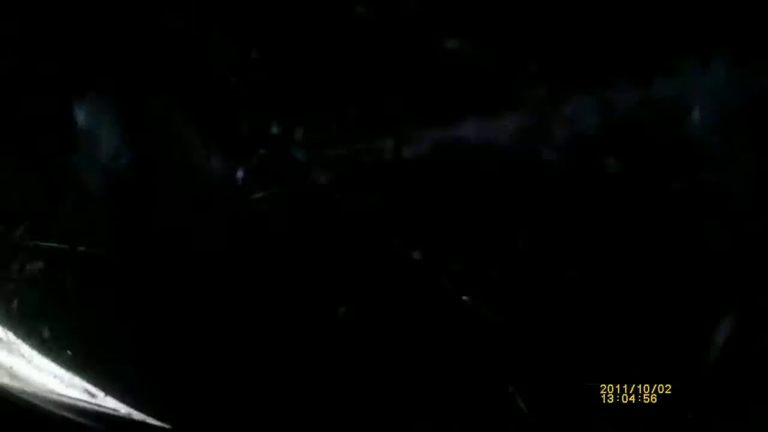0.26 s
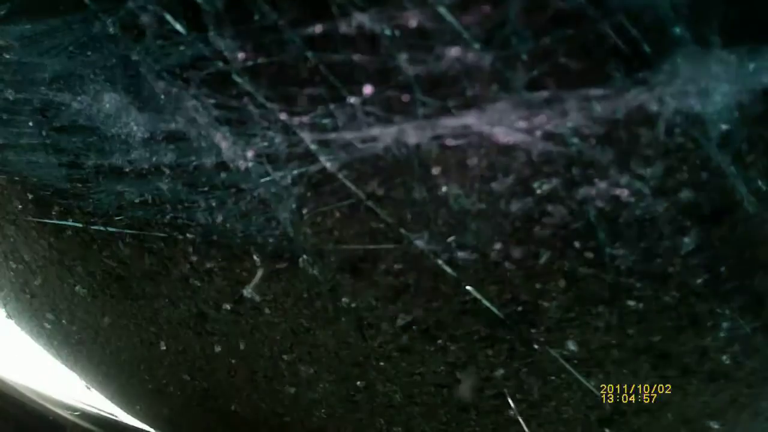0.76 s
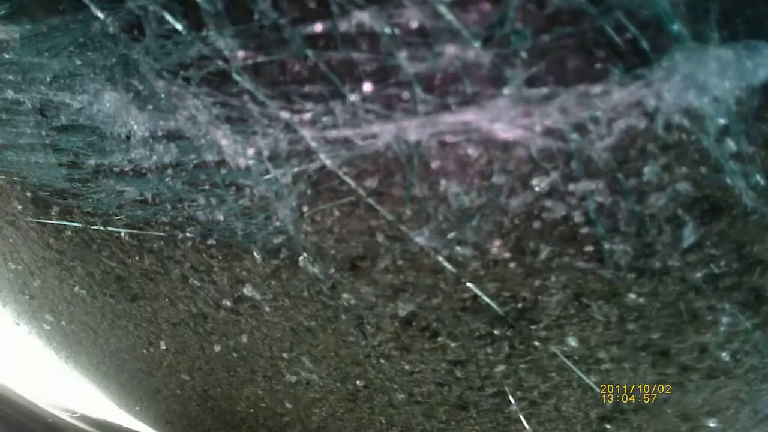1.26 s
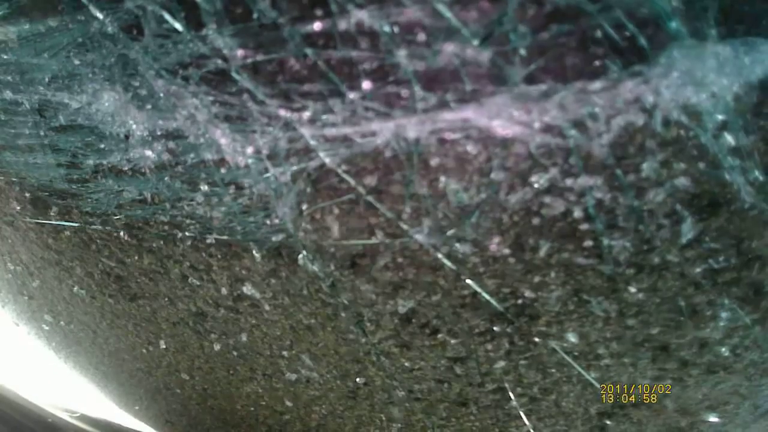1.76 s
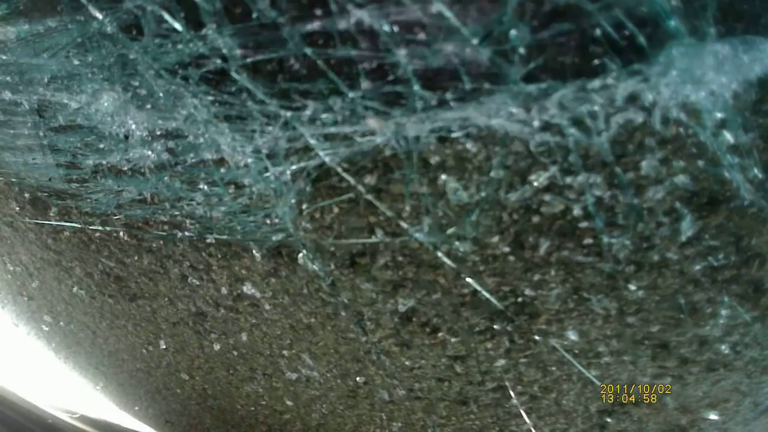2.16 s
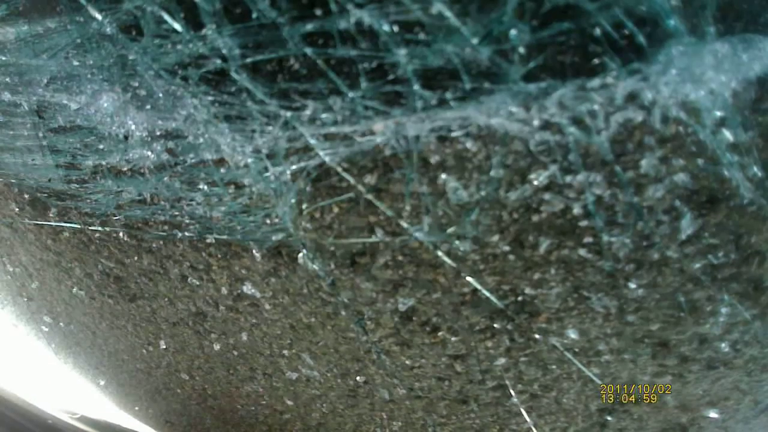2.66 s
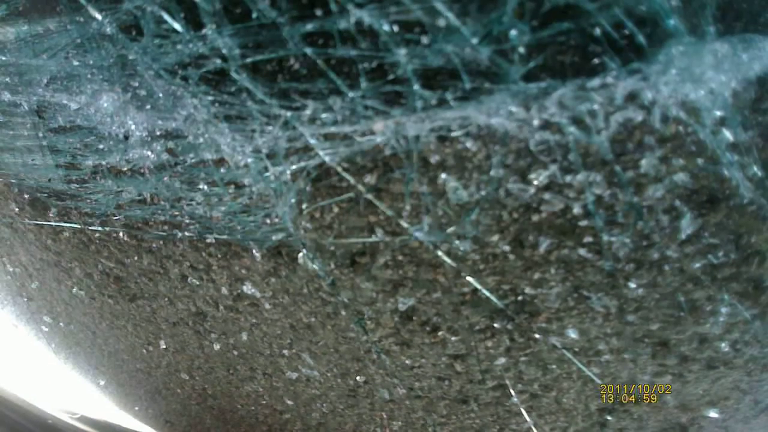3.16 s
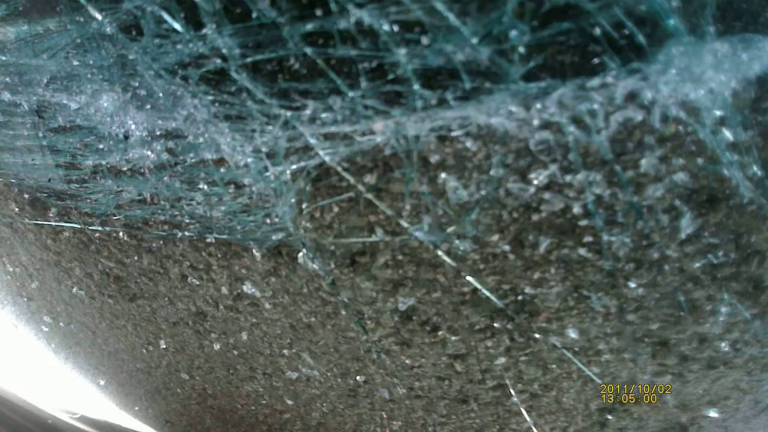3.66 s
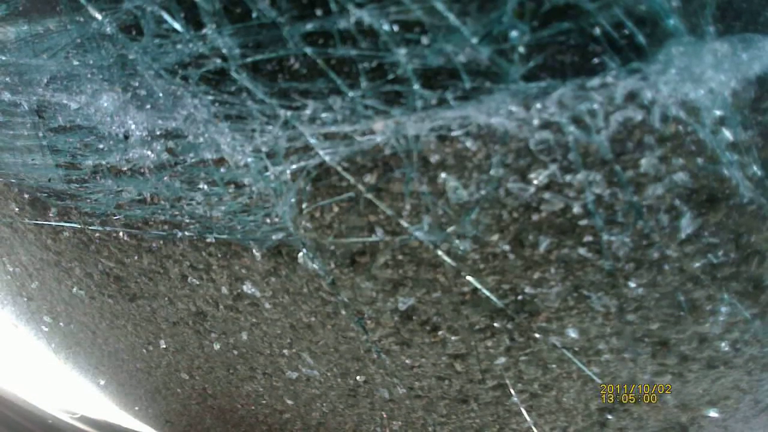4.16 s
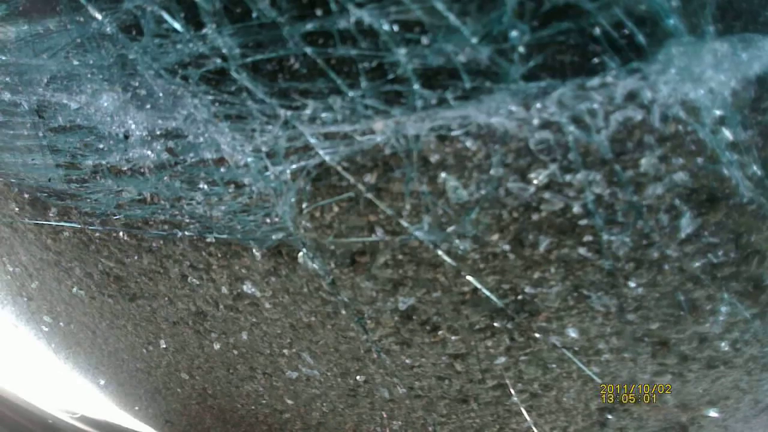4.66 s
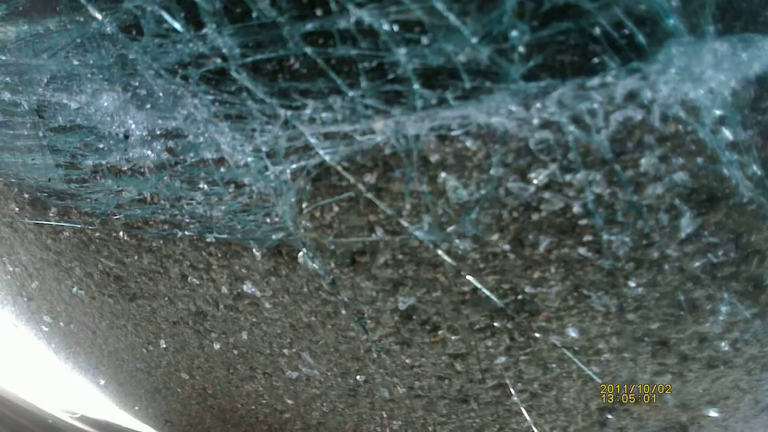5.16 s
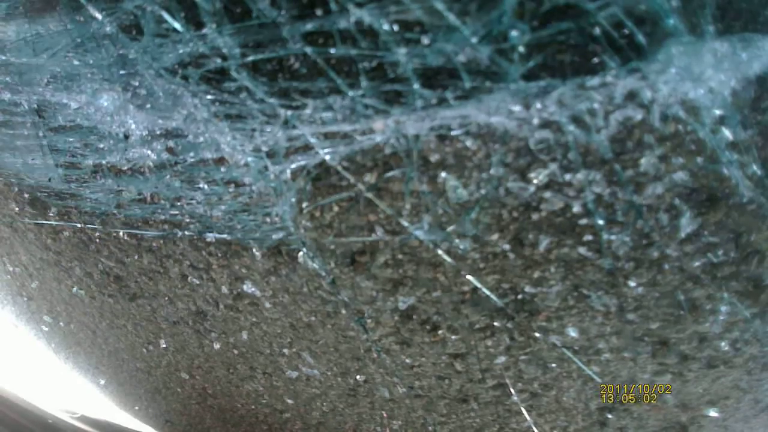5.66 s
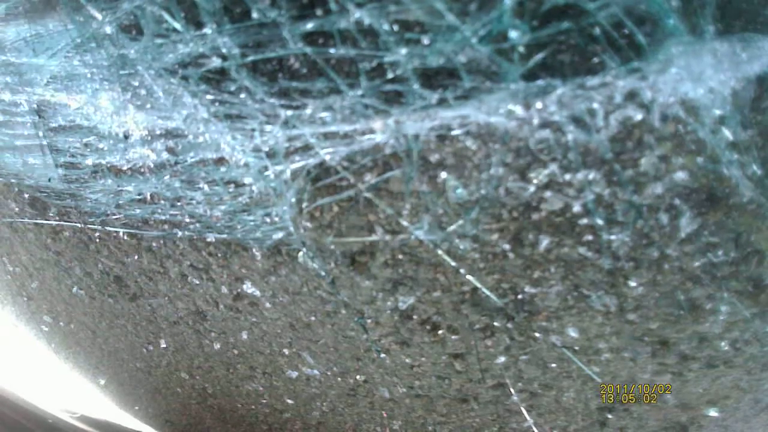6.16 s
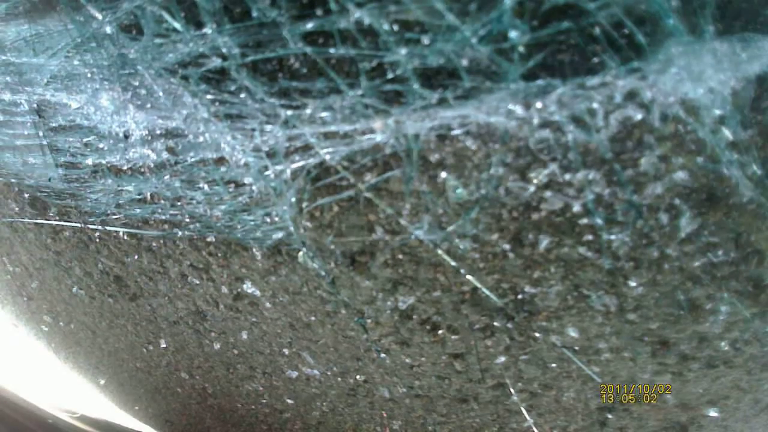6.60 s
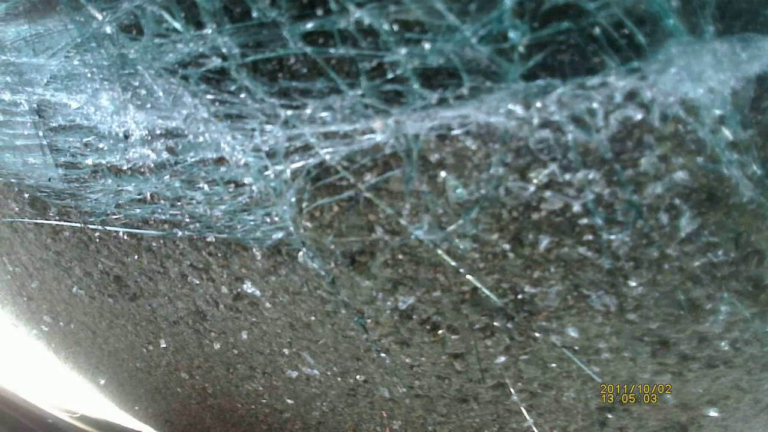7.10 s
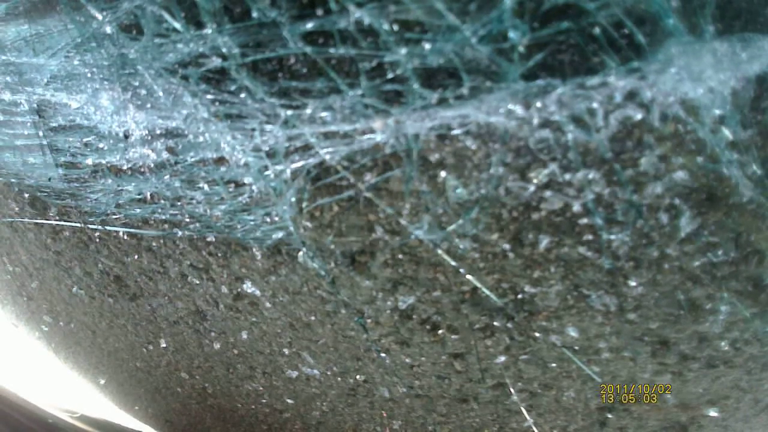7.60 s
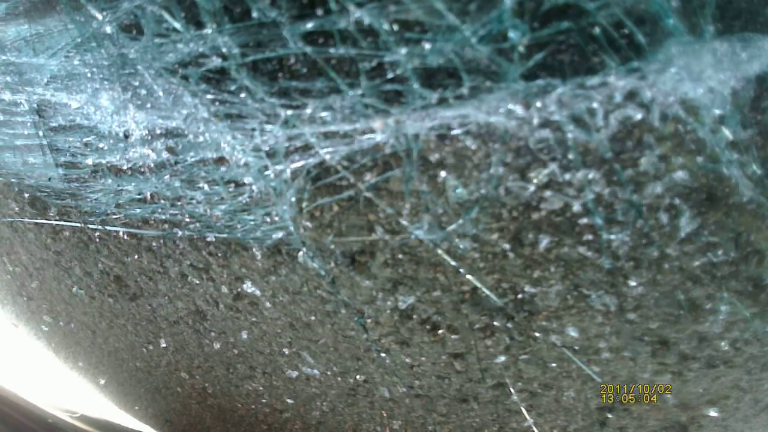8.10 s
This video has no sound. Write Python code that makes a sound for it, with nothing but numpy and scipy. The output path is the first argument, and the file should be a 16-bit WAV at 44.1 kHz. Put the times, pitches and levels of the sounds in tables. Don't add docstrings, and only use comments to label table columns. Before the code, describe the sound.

A squared-off, overloaded crash opens abruptly, with a short choked gap and another hit, then bodywork grinds to rest. Close, dry, dull-edged cabin sound: low hush and fine grit, scattered metallic knocks, shards clicking down. After a sparse lull, crunches return in two clusters separated by near quiet, with heavy buckling, short strained groans, pressure thumps and brittle glass cracks, continuing to the end.

```python
import sys
import numpy as np
from scipy import signal
from scipy.io import wavfile
from scipy.ndimage import uniform_filter1d

SR = 44100
rng = np.random.default_rng(int(sys.argv[2]) if len(sys.argv) > 2 else 0)


def unload_audio(sound):
    columns = np.transpose(np.atleast_2d(sound))
    steps = np.round(np.clip(columns, -1, 1) * 32767)
    wavfile.write(sys.argv[1], SR, steps.astype(np.int16))


def ratio(d):
    e = np.asarray(d, float) / 20
    return 10 ** e


N = 367794
T = np.arange(N) / SR

# start [s], grinding level [dB], slow push on the microphone [full scale], brightness [dB].
IMPACT = [
    (0, 16.5, 3.6, -13),
    (.03, 10, 3.3, -6.5),
    (.105, 9, 2.55, -7),
    (0.166, 6, 2.04, 6.5),
    (0.179, -16, 0.95, 11),
    (.3, -16, 0.99, 8),
    (0.31, -1.5, 2.05, 1),
    (0.359, 0, 1.66, 6),
    (.41, -6.5, 1.13, 14.5),
]
SLIDE = [(.448, 4, 1.44, 3.5), (.712, 0.5, 0.28, 7), (.86, -7, 0.1, 10), (1.04, -8.5, 0.02, 6),
         (1.2, -12, 0.01, 11), (1.3, -12.5, 0, 5), (1.47, -19.5, 0, 8), (2.06, -21.5, 0, 7),
         (2.69, -21.5, 0, -0.5), (3.4, -23.5, 0, 9), (4.45, -22.5, 0, -2.5), (4.95, -19.5, 0, 5.5),
         (5.5, -23, 0, 9.5), (5.89, -23.5, 0, 12), (6.5, -21, 0, 3.5), (7.25, -19, 0, 6.5),
         (7.6, -23, 0, 6), (8, -20, 0, -3), (8.34, -24, 0, -10)]
# frequency [Hz], density [dB per Hz].
GRIND = [(24, -43.5), (40, -15), (357, -6.5), (400, -1.5), (574, -6), (703, -1.5), (1100, 0), (1580, -3),
         (2540, -6.5), (4250, -16), (5550, -15), (7510, -18), (8800, -24.5), (11400, -71.5), (19400, -120)]
CABIN_DB = -23.5
RAIL = .707


def evened(x):
    return x / np.sqrt(np.mean(x ** 2) + 1e-20)


def colour(x, points):
    kept = [p for p in points if p[0] < 8300]
    hz, db = np.transpose(kept + [(8700, kept[-1][1]), (10000, -100)])
    log_hz = np.log(np.abs(np.fft.fftfreq(4096, 1 / SR)) + 1)
    log_gain = np.interp(log_hz, np.log(hz), db) * np.log(10) / 20
    response = np.exp(np.conj(signal.hilbert(np.maximum(log_gain, -11))))
    taps = np.fft.ifft(response).real
    return signal.oaconvolve(x, taps[:2048])[:len(x)]


def resonate(x, hz, width_hz):
    turn = np.exp(2j * np.pi * np.cumsum(hz * np.ones(len(x))) / SR)
    r = np.exp(-np.pi * width_hz / SR)
    smooth = signal.lfilter([1 - r], [1, -r], x / turn + 1e-18)
    return 2 * (turn * smooth).real


def split(x, hz):
    low = signal.lfilter(*signal.butter(1, hz, fs=SR), x)
    return low, x - low


def drift(hz):
    lowpass = signal.butter(2, hz, fs=SR, output="sos")
    return evened(signal.sosfilt(lowpass, rng.standard_normal(N)))


def snaps(per_s, spread_db):
    size = ratio(spread_db * np.minimum(rng.exponential(1, N), 4))
    return evened(size * rng.standard_normal(N) * (rng.random(N) < per_s / SR))


def patchy(x, patch_db):
    z = signal.stft(x, nperseg=512, noverlap=384)[2]
    field = rng.standard_normal(z.shape[::-1]).T
    field = uniform_filter1d(uniform_filter1d(field, size=6, axis=0), size=7, axis=1)
    return evened(signal.istft(z * ratio(patch_db * evened(field)), nperseg=512, noverlap=384)[1][:N])


def add(mix, at, sound):
    part = mix[at:][:len(sound)]
    part += sound[:len(part)]


def panels(shaking, ring_db):
    # frequency [Hz], width [Hz], level [dB].
    modes = [
        (334, 25, -3),
        (543, 30, -2),
        (700, 50, -3),
        (893, 45, 0),
        (1190, 150, -6),
        (2680, 400, -6),
        (5520, 350, 4),
    ]
    ring = sum(ratio(db) * resonate(shaking, hz, width_hz) for hz, width_hz, db in modes)
    return shaking + ratio(ring_db) * ring


def control(column):
    # bite [s], swell [s], hold [s], top level [dB], brightness
    # [dB].
    crunches = [(1.323, .003, 0.041, -14, 10.5), (1.589, 0.004, .012, -9, 8),
                (2.082, 0.018, 0.021, -14.5, -12), (2.891, 0.017, .005, -10, -11),
                (6.758, .002, .004, -3.5, 1), (4.551, 0.079, 0.021, 0.5, -0.5),
                (4.555, .004, .03, -8.5, -13), (4.514, .005, .04, -16.5, -3),
                (4.642, 0.0023, 0.008, -4, -6), (4.752, 0.002, 0.021, -10.5, 3),
                (4.829, 0.042, 0.049, -15, -1), (5.016, 0.074, .004, 1.5, 4), (5.119, 0.06, 0.065, -5, 8),
                (5.26, .003, 0.12, -12, 7.5), (5.345, 0.0034, 0.023, -0.5, 0),
                (5.938, 0.034, 0.13, -19, -0.5), (6.069, 0.095, 0.049, 4.5, -6),
                (6.263, 0.022, 0.046, -8, -2), (6.318, 0.004, 0.018, -1.5, 7.5),
                (6.795, .003, 0.055, 0.5, -11), (6.867, 0.034, 0.072, 0.5, -18),
                (7.049, 0.0023, 0.02, 2.5, -26), (7.105, .003, 0.032, -12.5, 1),
                (7.159, 0.0065, 0.016, -13, 6), (7.295, 0.0028, 0.06, -4.5, -16),
                (7.381, 0.054, 0.09, -10, -28), (7.724, .003, 0.054, -13.5, -21),
                (7.89, 0.0033, .002, -7, -9), (7.936, .002, 0.019, -12, -14)]
    swell_db_per_s, fall_db_per_s, bite_s = 168, 349, 0.0042
    push_at_0_db, push_law, tail_bright = 0.2, 1.3, -.12
    rows = np.array([*IMPACT, *SLIDE])
    out, level_db = (np.interp(T, rows[:, 0], rows[:, k]) for k in (column, 1))
    for s, swell_s, hold_s, top_db, bright_db in crunches:
        near = slice(round(s * SR), round((s + swell_s + hold_s) * SR) + SR // 4)
        t = T[near] - s
        rise_db = swell_db_per_s * np.maximum(swell_s - t, 0)
        fall_db = fall_db_per_s * np.maximum(t - swell_s - hold_s, 0)
        db = top_db - rise_db - fall_db - 20 * np.maximum(1 - t / bite_s, 0)
        value = (db, push_at_0_db * ratio(push_law * db), bright_db + tail_bright * fall_db)[column - 1]
        out[near] = np.where(db > level_db[near], value, out[near])
        level_db[near] = np.maximum(db, level_db[near])
    return uniform_filter1d(out, size=90)


def grinding():
    clumps = ratio(1.5 * np.tanh(drift(hz=80)))
    decay = ratio(-120 * np.arange(300) / SR / 0.016)
    slip_power = signal.oaconvolve(snaps(per_s=1300, spread_db=2.0) ** 2, decay)[:N]
    slips = np.sqrt(np.abs(slip_power))
    shaking = clumps * np.hypot(evened(slips), 0.8) * rng.standard_normal(N)
    body = patchy(colour(panels(shaking, ring_db=-2.0), GRIND), patch_db=1.5)
    low, high = split(body, hz=2310)
    above_hush = np.sqrt(np.maximum(ratio(control(column=1)) ** 2 - ratio(CABIN_DB) ** 2, 1e-7))
    return above_hush * (low + ratio(control(column=3) - 2.5) * high)


def push(jolts):
    # start [s], length [s].
    pinned_spans = [(0, .0073), (.0117, .003), (.037, .007), (.0969, .0065), (.1727, .1371), (.3293, .007),
                    (.3596, .003), (.434, .003), (.4925, .003), (6.224, .004), (6.31, .006), (7.0566, .004)]
    # time [s], depth [full scale].
    rail_slips = [
        (.0155, 5),
        (.1045, 2),
        (.1075, 4),
        (.111, 4),
        (.3645, 2),
        (.3665, 2.5),
    ]
    slip_s = .0005
    shove, level_db = np.maximum(control(column=2), 0), control(column=1)
    pinned = sum(((T > s) & (T < s + length_s)) * 1. for s, length_s in pinned_spans)
    slips = sum(depth * np.exp(-((T - s) / slip_s) ** 2) for s, depth in rail_slips)
    rumble = ratio(3.5 * np.minimum(level_db, 3) - 29.5) * drift(hz=70)
    rumble *= .5 + .5 * (T > SLIDE[1][0])
    kick = 0.33 * uniform_filter1d(np.maximum(np.abs(jolts) - .25, 0), size=260)
    sway = 1 + 0.08 * np.minimum(ratio(level_db), 1) * drift(hz=60)
    shove *= np.maximum(np.clip((level_db + 15) / 6, 0, 1), T < SLIDE[0][0])
    return shove * sway + rumble + kick - slips + 9 * uniform_filter1d(pinned, size=9)


def burst(shake, snap, s, db, hz, width_hz, t60_s, treble_db):
    snap_db = -3.5
    at = round(s * SR)
    t = np.arange(4400) / SR
    decay = ratio(-60 * t / t60_s) + ratio(-8.0 - 60 * t / 0.0055) + ratio(-16.0 - 60 * t / (5.5 * t60_s))
    low, high = shake[:, at:at + len(t)] * decay * np.minimum(t / 0.00014, 1)
    ring = resonate((low + high) * ratio(-60 * t / 0.18), hz, width_hz)
    sound = evened(low) + 1.02 * evened(ring) + ratio(treble_db) * evened(high)
    sound = sound / np.abs(sound).max() + ratio(snap_db) * np.sign(low[9]) * snap
    return at, ratio(db) * sound / np.abs(sound).max()


def cracks():
    # time [s], peak [dB], ring [Hz]. Panel knocks while the wreck settles.
    settling = [(1.32, 4.5, 1820), (1.398, -4, 1230), (1.492, -2, 810), (1.5365, -7, 1140), (1.589, 2, 900),
                (1.674, 3.5, 1250), (1.736, -3, 910), (1.775, -1, 960), (1.812, -11, 1030),
                (1.911, 0.5, 1100), (1.996, -2.5, 960), (2.036, -0.5, 870), (2.088, -4.5, 1220),
                (2.141, -1.5, 1040), (2.24, -9, 990), (2.266, -11, 1010), (2.43, -11, 1000),
                (2.513, -7, 1130), (2.709, -6.5, 730), (2.716, -6, 900), (2.839, -2, 1160), (2.9, -6, 514),
                (2.966, -0.5, 1190), (3.127, -3, 835), (3.173, 6.5, 855), (3.264, -5.5, 890),
                (3.319, -5, 1110), (3.592, -6.5, 861), (3.6545, -3, 890), (3.697, -13, 900),
                (3.738, -14, 1220), (3.918, -6.5, 885), (4.165, -6, 910), (4.29, -6, 900)]
    buckling = [(4.508, -4, 1050), (4.538, -4, 1130), (4.555, -6, 1050), (4.752, 3, 2250),
                (4.865, -16, 1110), (4.905, -11, 1200), (4.962, -7, 1129), (5.021, 13, 657),
                (5.61, -7, 1140), (6.021, -14, 1080), (6.069, 11, 1086), (6.323, 1, 1300),
                (6.386, 11.5, 1290), (6.466, -4.5, 1070), (6.547, -9.5, 1170), (6.657, -1.5, 1220),
                (6.678, -4, 900), (6.764, 9, 1000), (7.05, 7.5, 980), (7.069, -4.5, 840), (7.295, 4, 910),
                (7.404, -1, 880), (7.449, 5.5, 686), (7.018, -5, 1000), (7.607, -11, 885), (7.739, -9, 900),
                (7.7215, -1, 860), (7.785, -1.5, 1270), (7.7945, 5, 1260), (7.887, 12.5, 1254),
                (7.943, 5.5, 864), (8.141, 2.5, 1100), (8.202, -2, 920), (8.256, 1.5, 1370)]
    glass_ticks = [(1.157, -7, 5530), (1.216, 11, 3600), (1.244, 9.5, 5500), (1.34, -5, 5750), (1.3975, 1, 4860),
                   (1.455, -2.5, 5790), (1.492, 5, 3080), (1.5362, 5.5, 3300), (1.598, 10, 3130),
                   (1.6778, 2, 5700), (1.9027, -6.5, 3020), (2.052, -1, 3260), (2.155, -2, 3220),
                   (2.142, -13, 3000), (3.718, -18, 5600), (3.879, -13.5, 5600), (2.802, -12, 1700),
                   (3.2705, -5, 5500), (1.633, -1, 2520), (1.737, -12, 6500), (1.813, -7, 5530),
                   (2.035, -2, 5500), (2.093, -6, 6000), (2.24, -14.5, 2800), (2.265, -20.5, 5500),
                   (2.378, -4.5, 6280), (2.43, -13, 5500), (2.481, -9.5, 5660), (2.685, -5, 2600),
                   (2.712, -2.5, 5600), (2.802, -8, 2430), (2.86, -9, 6000), (3.112, -10, 2660),
                   (3.175, -4, 2610), (3.32, -6, 5500), (3.418, -13.5, 5500), (3.461, -15, 5750),
                   (3.592, -13, 5000), (3.696, -22, 5500), (3.898, -15, 5560), (3.988, -13.5, 5300),
                   (4.06, -18.5, 5600), (4.12, -11, 5460), (2.5905, -6, 5570), (2.759, -11, 5440),
                   (2.84, -2, 2390), (2.897, -6, 3000), (2.911, 3, 5530), (2.9667, 0, 5440), (3.236, -7, 5800),
                   (3.262, -7, 3200), (3.508, -8, 2500), (3.6537, 0, 3680), (3.738, -4, 3460),
                   (3.9148, -9.5, 3180), (4.077, -10, 5600), (4.108, -6, 5500), (4.1654, -3.5, 3480),
                   (4.3592, -7, 5650),
                   (4.5793, 2.5, 3130), (4.602, 11, 6100), (5.0211, 8, 4660), (5.1475, 3.5, 5400),
              (5.2794, -1, 3220), (5.349, 7.5, 5400), (4.905, -3, 2580), (5.466, -10.5, 6000),
              (5.5258, -5, 3500), (5.598, -22, 5500), (5.684, -18, 3560), (5.78, -13, 5530),
              (5.89, -15, 5440), (5.951, -9.5, 3200), (6.045, -14, 6500), (7.407, 0, 2470),
              (7.435, -6, 3600), (7.362, -3, 4500), (7.378, -11, 5000), (7.667, -9, 5500),
              (7.685, -13, 5500), (7.772, -14, 6000), (8.09, -15, 5500), (6.079, 0, 3070),
              (6.316, 15, 6350), (6.6575, -4, 4960), (6.6764, 3, 5370), (6.771, 6, 5700), (6.7976, 0, 3890),
              (6.901, 16, 4500), (7.018, -5, 5000), (7.17, -9, 5500), (7.265, -5, 5260), (7.297, 4, 3000),
              (7.503, -1, 2700), (7.7936, 0, 3320), (7.8867, -7, 3130), (7.941, -12, 3300),
              (7.958, -9, 2000), (7.9, -7, 3400), (8.2544, 9.5, 5770)]
    out, ticks = np.zeros((2, N))
    panel, glass = (np.array(split(colour(rng.standard_normal(N + SR), GRIND), hz=3200)) for _ in "ab")
    snap = split(colour(signal.unit_impulse(4400, 9), GRIND), hz=900)[1]
    snap = snap / np.abs(snap).max()
    for knocks, treble_db, t60_s in ((settling, -1.1, 0.048), (buckling, -10, 0.047)):
        for s, db, hz in knocks:
            add(out, *burst(panel, snap, s, db - 3.0, hz, 85, t60_s * ratio(0.067 * db), treble_db))
    for s, db, hz in glass_ticks:
        add(ticks, *burst(glass, snap, s, db - 1.0, hz, width_hz=470, t60_s=.032, treble_db=1.7))
    thin_ticks = split(split(ticks, hz=1500)[1], hz=1500)[1]
    return out + thin_ticks


def groans():
    # start [s], length [s], level [dB], start pitch [Hz], end pitch [Hz]. Strained panels sing during
    strained_panels = [(1.076, 0.062, -12, 2310, 2030), (1.171, 0.033, -13, 900, 900),
                       (1.242, 0.027, -14.5, 246, 214), (2.087, 0.016, -11.5, 1250, 1160),
                       (2.895, 0.039, -14.5, 497, 390), (2.898, 0.02, -14.5, 2000, 1910),
                       (4.599, 0.022, -3, 426, 362), (4.609, 0.08, -8.5, 665, 667),
                       (4.746, 0.038, -14, 2370, 2230), (5.028, 0.027, -10, 680, 670),
                       (5.205, 0.072, -2.5, 830, 665), (5.242, 0.052, -11, 2100, 2120),
                       (6.079, 0.035, -6.5, 1140, 1080), (6.097, 0.041, -5.5, 553, 476),
                       (6.14, 0.051, -8, 1370, 1210), (6.234, 0.065, 1, 1310, 970),
                       (6.796, 0.081, -2.5, 898, 899), (6.784, 0.18, -11.5, 2480, 2660),
                       (6.912, 0.056, -11, 388, 320), (6.955, 0.052, -20, 1180, 1170),
                       (7.08, 0.062, -1, 710, 330), (7.309, 0.051, -10, 940, 930),
                       (7.296, 0.092, -15.5, 2580, 2360), (7.939, 0.03, -8.5, 1050, 1160),
                       (4.553, 0.079, -10.5, 1046, 1160), (4.86, 0.068, -35, 1120, 1090),
                       (5.062, 0.07, -13, 1090, 1060), (5.35, 0.04, -13, 1500, 1370),
                       (6.671, 0.027, -21, 800, 767), (7.316, 0.068, -30, 2900, 2840),
                       (7.497, 0.025, -13.5, 2700, 2880), (7.728, 0.052, -16.5, 920, 855),
                       (5.527, 0.018, -30, 3600, 3540), (5.68, 0.02, -30, 3560, 3570),
                       (0.454, 0.047, -0.5, 1060, 1170), (.53, 0.076, -10, 1156, 1134),
                    (0.65, .07, -14, 2800, 2600), (.8, 0.046, -17, 1170, 1250),
                    (0.939, .06, -12.5, 1240, 1150), (6.69, 0.057, -33, 800, 860),
                    (6.969, 0.022, -9, 2740, 2730), (5.215, .05, -9, 1150, 1100),
                    (5.25, .03, -14, 2650, 2600), (7.5, 0.038, -20, 930, 1000),
                    (6.32, 0.043, -9, 1150, 1080), (7.52, 0.029, -22, 3300, 3200),
                    (4.58, .04, -15, 1400, 1300), (6.135, .06, -9, 2200, 2100),
                    (6.108, 0.024, -16, 5550, 5500), (4.66, 0.043, -18, 1140, 1170),
                    (5.09, .06, -14.5, 1150, 1100), (6.96, 0.0452, -14, 1200, 1180),
                    (.86, 0.058, -15, 3160, 2840), (1.0, .05, -19, 2600, 2940),
                    (5.36, .035, -13, 1640, 1460), (4.752, 0.014, -14, 1500, 1470),
                    (7.44, 0.036, -22, 2430, 2500)]
    out = np.zeros(N)
    for s, length_s, db, start_hz, end_hz in strained_panels:
        count = round(length_s * SR)
        width_hz = 0.014 * start_hz + 0.83 * abs(end_hz - start_hz)
        hz = np.geomspace(start_hz, end_hz, count)
        rub = rng.standard_normal(SR // 2)[:count]
        sung = resonate(resonate(rub, hz, width_hz), hz, 8.4 * width_hz)
        add(out, round(s * SR), ratio(db) * evened(sung) * signal.windows.tukey(count, .5))
    return out


def thuds():
    # centre [s], level [dB], length [s].
    lurches = [(.534, -14, .012), (.597, -12, .014), (0.672, -5, 0.011), (.69, -14, .01),
               (0.752, -12, .014), (.818, -6, .014), (0.852, -17, .014), (0.9, -21, .014),
               (0.978, -14, .018), (1.068, -22, .014), (1.22, -16, .014), (1.247, -13, 0.013),
               (4.563, -14, .012), (4.583, -15, 0.012), (4.604, -17, 0.011), (5.088, -7, .018),
               (5.157, -12, 0.012), (5.213, -7, .018), (5.258, -16, .02), (6.109, -13, .014),
               (6.15, -6, .016), (6.172, -6, .018), (6.221, -2, 0.045), (6.271, -3, .016),
               (6.321, -1, 0.038), (6.809, -11, .016), (6.839, -4, .02), (6.909, -11, .014),
               (6.978, -17, 0.015), (7.056, 0, 0.018), (7.067, -1, 0.024), (7.45, -24, 0.015),
               (7.894, -9.5, 0.015), (7.947, -20, .016)]
    out = np.zeros(N)
    for s, db, length_s in lurches:
        add(out, round((s - length_s / 2) * SR), ratio(db) * np.hanning(round(length_s * SR)))
    return out


def cabin():
    # frequency [Hz], density [dB per Hz].
    hush_curve = [(24, -50.5), (40, -15), (54, -18), (64, -25), (138, -10.5), (190, -8.5), (233, -4),
                  (418, -2), (1210, -2.5), (1850, -14), (2600, -16), (4300, -28.5), (5550, -22.5),
                  (8040, -30), (8800, -46.5), (11400, -71.5), (19400, -120)]
    creep = snaps(per_s=150, spread_db=2.6)
    creep_tail = rng.standard_normal(900) * ratio(-60 * np.arange(900) / SR / 0.018)
    creep = signal.oaconvolve(creep, creep_tail)[:N]
    grit = rng.standard_normal(N) * ratio(.8 * drift(hz=17.6))
    shaking = grit + ratio(-6.5) * evened(split(creep, hz=1200)[1])
    hum = evened(resonate(resonate(rng.standard_normal(N), 154.7, width_hz=5.2), 150, width_hz=20))
    hush = patchy(colour(panels(shaking, ring_db=-7), hush_curve), patch_db=1.3)
    return ratio(CABIN_DB) * (hush + ratio(-18.5) * hum)


def scene():
    jolts = cracks()
    return (cabin() + grinding() + groans() + jolts + push(jolts) + thuds())[None]


def converter(dry):
    # time [s], depth [full scale].
    nicks = [(.24987, .25), (.25046, .27), (.2964, .2), (.3127, 1.1), (.3198, 1.3), (.3285, .5), (.338, .4),
             (.343, 1.3), (.345, 1.1), (.347, 1.3), (.348, 1.3)]
    whine_hz, whine_db, offset = 7757.5, -47, -.102
    slow = signal.resample_poly(dry, 160, 441, axis=1, window=("kaiser", 8), padtype="edge")
    count = slow.shape[1]
    waver = np.cumsum(.025 * rng.standard_normal(count))
    whine = ratio(whine_db) * np.sqrt(2) * np.sin(2 * np.pi * whine_hz * np.arange(count) / 16000 + waver)
    slow = np.clip(slow + whine + offset, -RAIL, RAIL)
    for s, depth in nicks:
        slow[:, round(s * 16000)] = RAIL - depth
    return slow


def upsample(slow):
    smooth = signal.firwin(441 * 26 + 1, 7900, window=("kaiser", 9), fs=SR * 160)
    fast = signal.resample_poly(slow, 441, 160, axis=1, window=smooth, padtype="edge")[:, :N]
    fast = np.clip(fast, -1.025 * RAIL, 1.025 * RAIL)
    fast = np.pad(fast, ((0, 0), (300, 300 + N - fast.shape[1])), "edge")
    lowpass = signal.firwin(601, 15750, window=("kaiser", 9), fs=SR)
    return signal.oaconvolve(fast, lowpass[None], "valid")


def band_limit(x):
    return signal.sosfilt(signal.butter(12, 16520, fs=SR, output="sos"), x)


def record(dry):
    mix = upsample(converter(dry))
    return band_limit(mix)


dry = scene()
out = record(dry)
unload_audio(out)
```